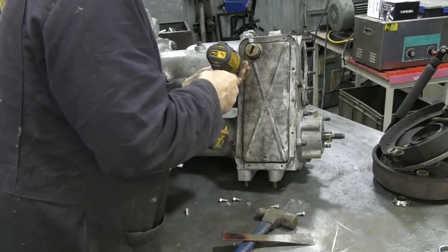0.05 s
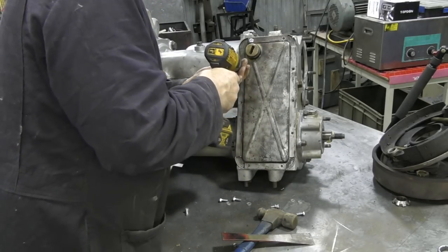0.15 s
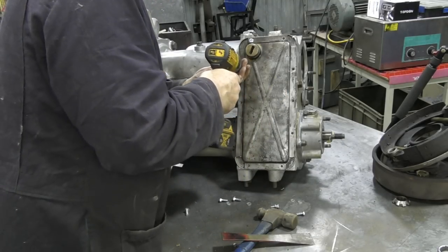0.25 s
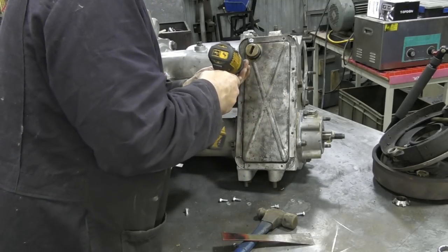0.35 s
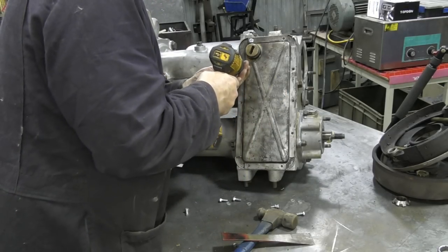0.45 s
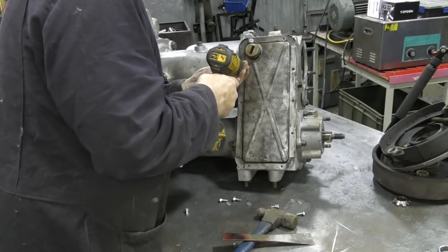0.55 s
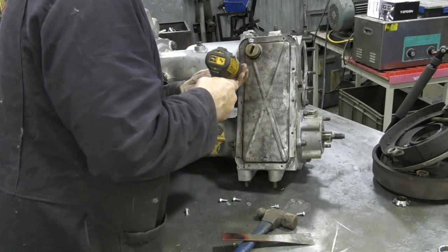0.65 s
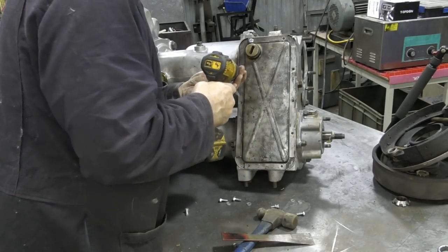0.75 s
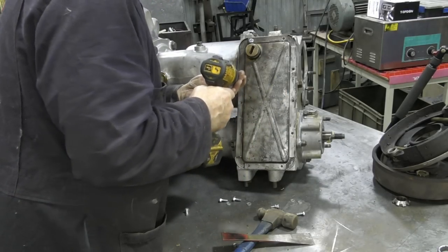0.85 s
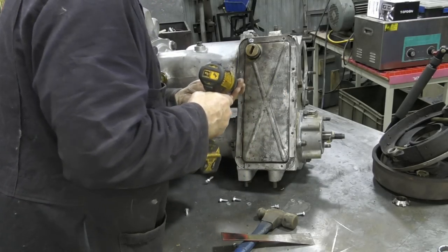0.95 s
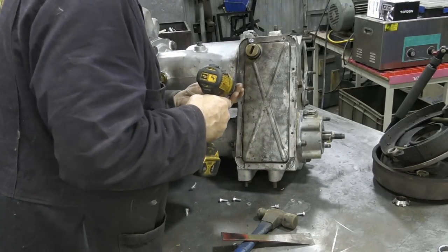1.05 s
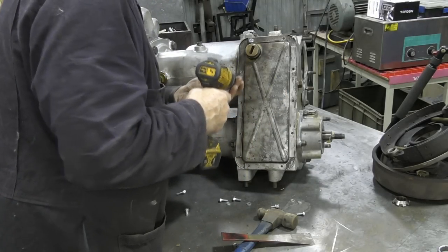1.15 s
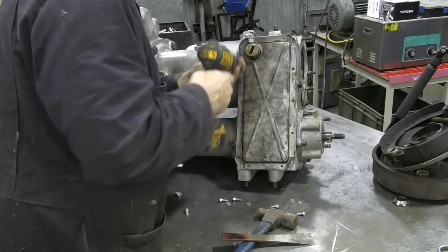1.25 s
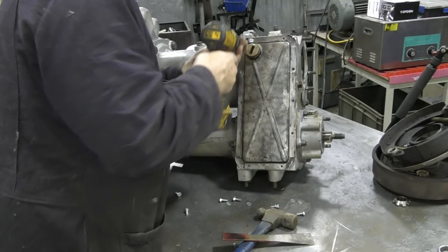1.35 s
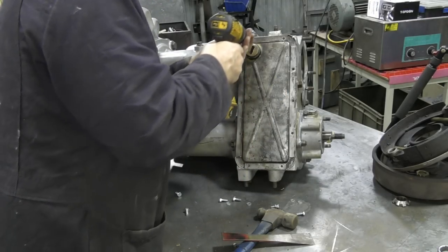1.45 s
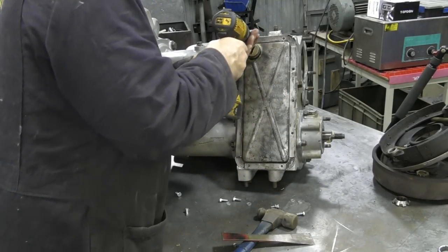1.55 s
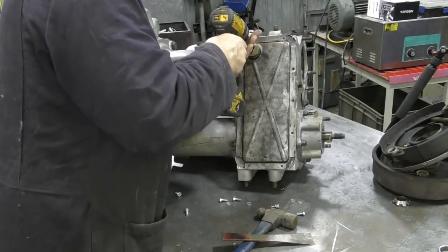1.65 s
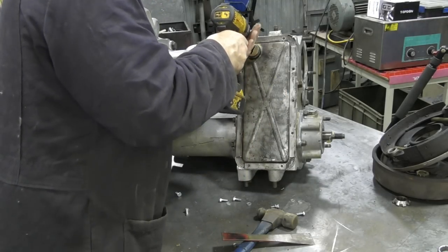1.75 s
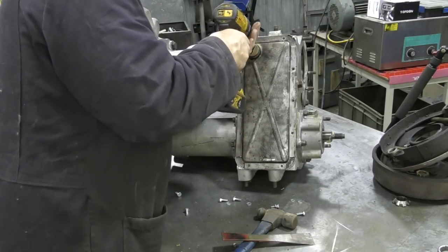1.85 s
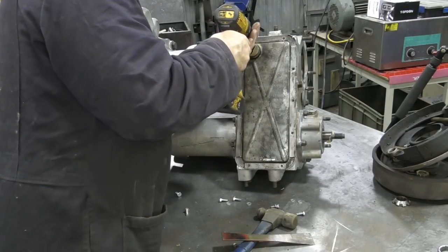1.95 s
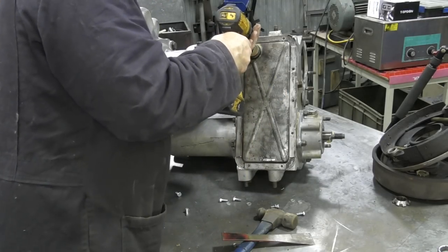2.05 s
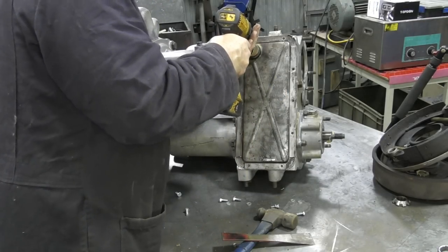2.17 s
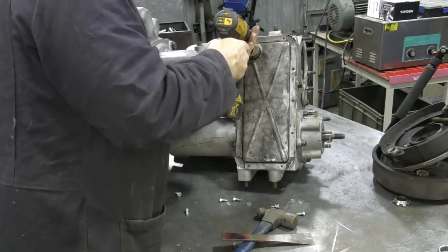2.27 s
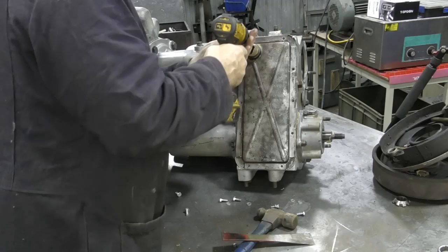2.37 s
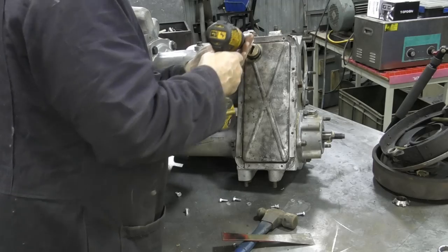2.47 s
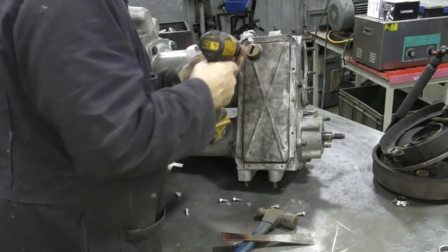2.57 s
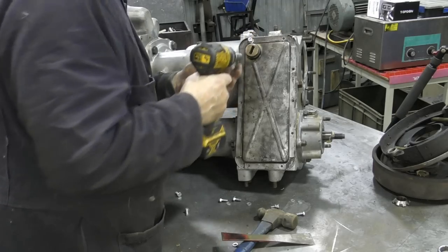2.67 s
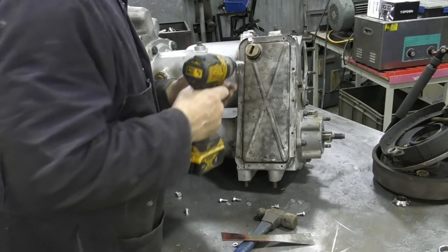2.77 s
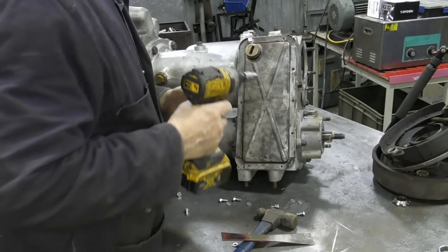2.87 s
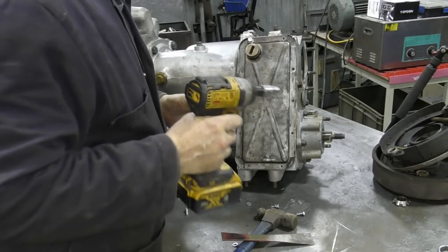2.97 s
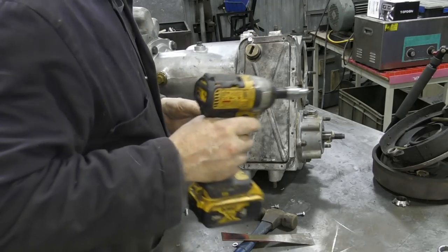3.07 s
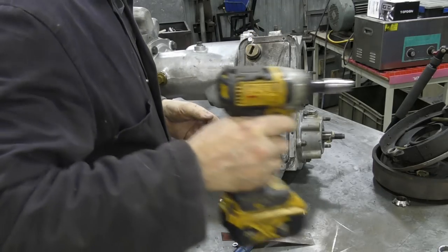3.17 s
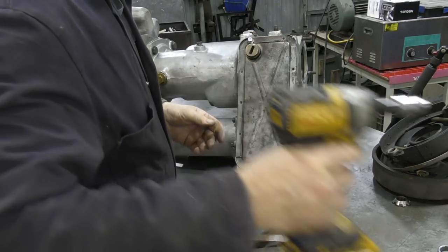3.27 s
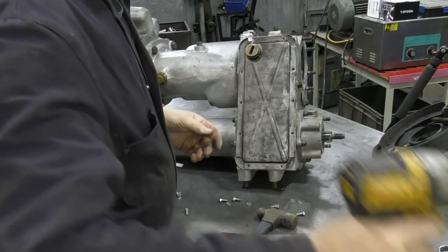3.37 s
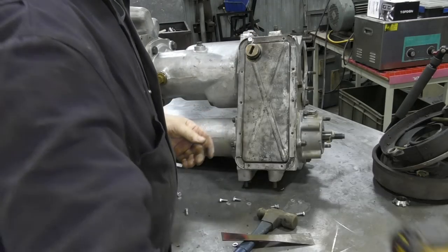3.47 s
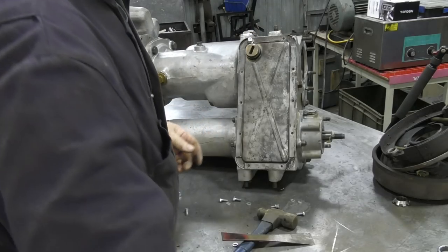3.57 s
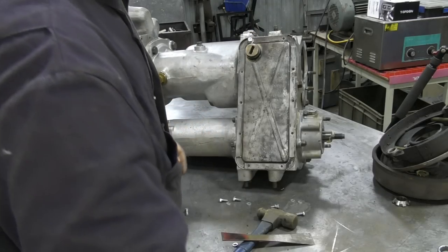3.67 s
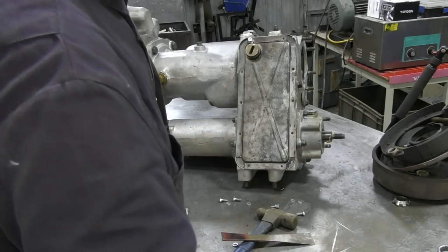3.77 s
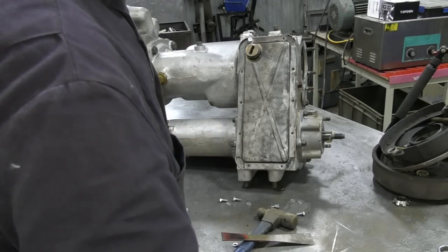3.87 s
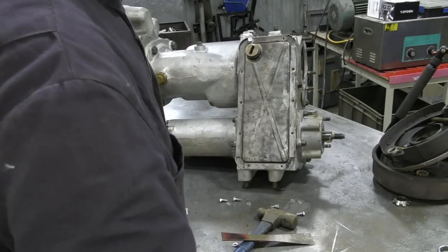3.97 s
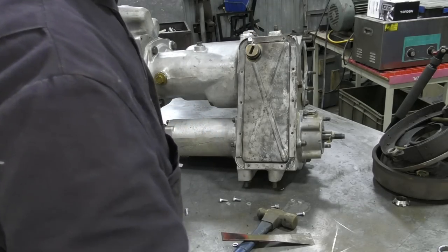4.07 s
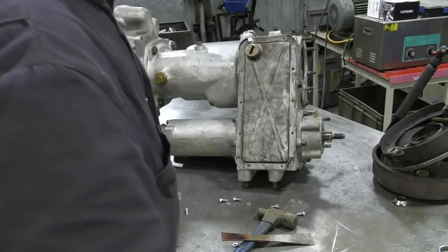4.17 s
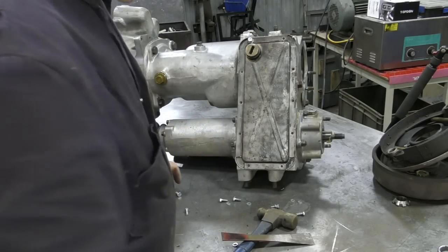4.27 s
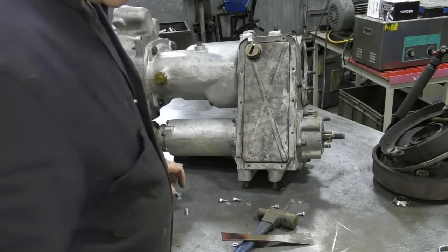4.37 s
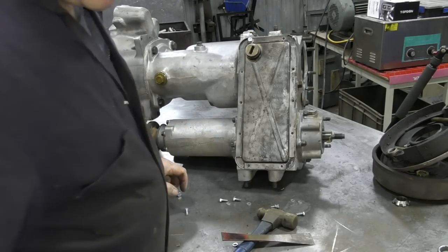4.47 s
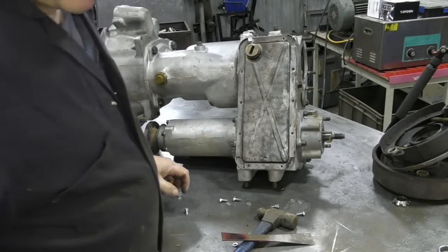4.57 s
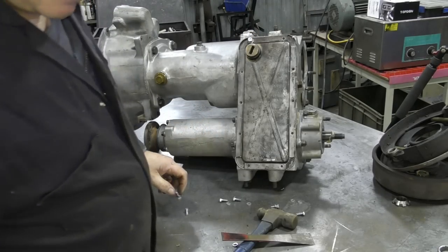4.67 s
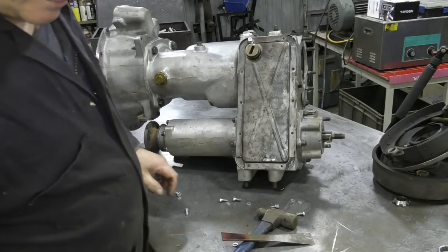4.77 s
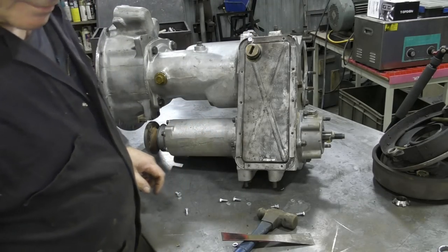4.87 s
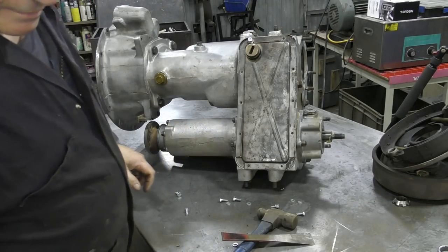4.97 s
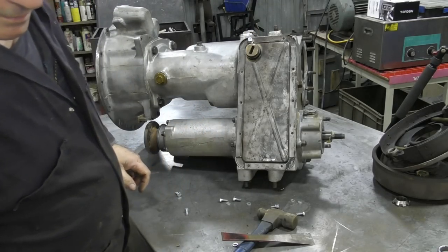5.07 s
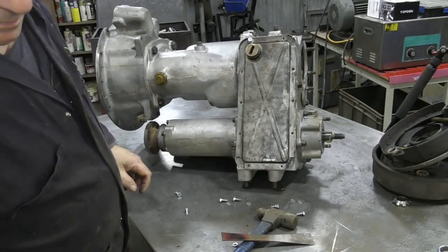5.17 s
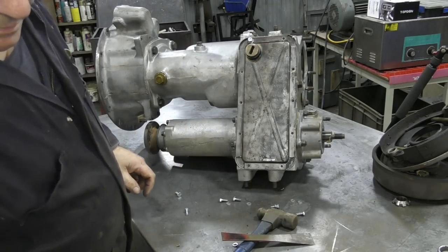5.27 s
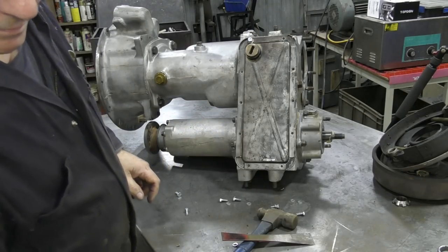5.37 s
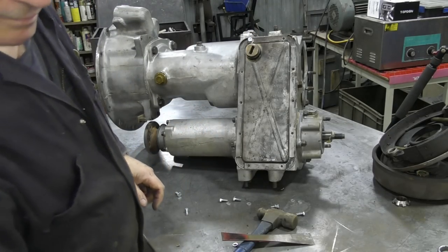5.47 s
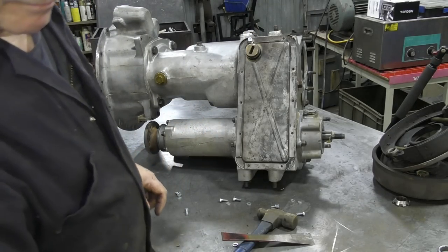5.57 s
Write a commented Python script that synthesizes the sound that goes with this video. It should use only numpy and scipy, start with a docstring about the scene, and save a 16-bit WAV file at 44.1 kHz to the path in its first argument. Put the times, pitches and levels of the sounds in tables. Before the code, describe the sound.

A power driver whirs twice at close range, each short burst climbing in pitch as a bolt comes free, with light metallic clicks and rattles in between. After a pause the tool lands on a workbench with a quick double knock. Soft clothing rustles follow, and near the end a metal object drags and clinks on the bench. Faint steady workshop noise and distant hum lie underneath.

```python
"""A workshop. A cordless drill-driver spins two bolts out of a cast gearbox cover; its gears whine up
as each thread frees. Between the bursts the socket and a loose bolt rattle and click on the casting.
The drill is stood on the bench with a double knock, overalls rustle, and something metal is dragged
across the bench top. Steady noise and the hum of distant machinery lie faintly underneath."""
import sys
import numpy as np
from scipy import signal
from scipy.fft import rfft, irfft, next_fast_len
from scipy.io import wavfile
from scipy.ndimage import uniform_filter1d, map_coordinates

SR = 44100
rng = np.random.default_rng(int(sys.argv[2]) if len(sys.argv) > 2 else 0)


def master(y):
    """Save y as 16-bit WAV."""
    cut = np.clip(np.atleast_2d(y).T, -1, 1)
    pcm = np.round(cut * 32767)  # scale
    wavfile.write(sys.argv[1], SR, pcm.astype(np.int16))


N = 248018

# Each row: times of socket bite, motor pick-up, thread release and braking in seconds, first and top
# whine in Hz, run-up time constant in seconds, tightness 0-1, base whine, mesh and grind levels in dB.
TRIGGER_PULLS = [(0, .112, .116, .311, 2108, 3401, .185, 0.99, -13, -18.5, -16),
                 (1.6754, 1.637, 1.738, 1.873, 1200, 2700, .083, .55, -15.5, -18.5, -16.5)]
# Gear tones, split into pairs by the circling planets.
# Each row: multiple of the whine, level at full load in dB, level at no load in dB.
MESH_TONES = [(.758, -13.5, -7), (.788, -11.5, -9), (1.51, -8.5, -7), (1.532, -5, -9), (1.578, -15, -8.5),
              (2.301, -9, -11.5), (2.338, -10, -9.5), (3.08, -3.5, -20), (3.14, -12.5, -17),
              (3.86, -12.5, -14), (4.61, -5.5, -21), (5.38, -11.5, -23.5)]
# Each row: start in seconds, gear clash in dB, socket ring in dB.
BRAKE_JOLTS = [(0.32, -22, -33), (.335, -25.5, -38), (1.884, -12, -15), (1.897, -22, -12.5)]
# Metal on the casting. Each row: start in seconds, gain in dB, relative knock and tick levels in dB.
CONTACTS = [(0.3468, -2, -28, -12), (.4094, -21.5, -35, 2.5), (0.4833, -17, -35, -7),
            (0.5599, -13, -22.5, -8.5), (.629, -10, -15.5, 5), (0.6908, -7, -28, -4),
            (.755, -13.5, -17, -3), (0.7752, -9, -21, 6), (0.9048, -15, -28, 2),
            (1.1521, -36.5, -13.5, 0.5), (1.175, -40, -14, -1), (1.2514, -9, -16.5, -25.5),
            (1.402, -39.5, -3.5, 4), (1.4837, -14, -13, -22), (1.615, -23.5, -13, -13.5),
            (1.6368, -22, -15.5, -12.5), (1.6762, -1, -15, -17.5), (1.6993, -2, -14.5, -10.5),
            (1.7069, -10, -14.5, 1), (1.7534, -6.5, -32, -10), (3.5048, -22.5, -5.5, -10.5),
            (5.3314, -10.5, -28, -13), (5.3592, -9, -28.5, -6)]
# Battery on bench. Each row: start in seconds, thud in dB, clack in dB, dulling in dB per octave.
LANDINGS = [(3.3765, -18.5, -16, 0.5), (3.383, -24.5, -22, -3.5), (3.499, -33.5, -28.5, 14),
            (3.507, -37, -20.5, 8), (3.521, -38, -34, 2), (3.555, -52, -35.5, 0)]
# Each row: frequency in Hz, level in dB, T60 in seconds.
BENCH_MODES = [(145.3, -26, .45), (177.6, -20, .36), (244, -25, 0.12), (264.5, -2, 0.19), (323.5, -7, 0.23),
               (368, -7.5, 0.13), (453, -10, 0.18), (490, -2.5, 0.081), (518, -2, 0.22), (609, -31, .15),
               (738, -2.5, 0.11), (940, -27, 0.13), (1210, -20, .089)]
# Push on the dragged metal. Each row: time in seconds, drone in dB, grit in dB.
DRAG_PUSH = [(5.2925, -38, -35), (5.304, -31, -35.5), (5.336, -26.5, -24), (5.404, -25.5, -31.5),
             (5.426, -30, -40.5), (5.486, -35.5, -40), (5.61, -26, -36)]

# Each row: time in seconds, level in dB.
KICKS = [(1.677, -35.5), (1.703, -28)]
BOLT_JOGS = [(.631, -14.5), (.656, -14), (.684, -14), (.774, -19.5), (.835, -23), (.904, -28.5)]
SOCKET_RUBS = [(1.424, -32), (1.488, -30), (1.615, -42.5), (1.668, -30)]
CLINKS = [(5.392, -17.5)]

# Each row: time in seconds, length in seconds, level in dB.
BOLT_SLIDES = [(.96, .29, -48.5)]  # timed at the start
CLOTH_BRUSHES = [(2.497, 0.47, -56.5), (2.938, 0.13, -64.5), (4.06, .07, -50.5), (4.332, 0.037, -59.5),
                 (4.496, 0.029, -58.5), (4.769, 0.049, -53.5), (4.917, .055, -50.5), (5.228, 0.15, -57.5)]  # timed at the centre

# Resonances. Each row: frequency in Hz, bandwidth in Hz, gain in dB.
CASTING_MODES = [(781, 30, -1), (1031.5, 40, -7), (1440, 160, -9.5), (2304, 60, -7.5), (2440, 160, -4.5),
                 (2860, 190, -9.5), (3253, 320, -3.5), (4260, 99, -12), (5450, 120, -13.5), (6000, 80, -14)]
COVER_MODES = [(768, 36, 5)]  # the plate drums under the tool
BENCH_TOP_MODES = [(480, 64, -2.5), (717, 34, -1), (898, 38, -1.5)]  # stirred by dragging

# Noise spectra. Each row: frequency in Hz, relative density in dB.
GRIND_SPECTRUM = [(24, -76), (40, -51.5), (615, -13), (751, -16.5), (1200, -8.5), (1590, -7), (2000, -10.5),
                  (2210, -11.5), (2570, -6), (3060, -7), (4130, -9.5), (5050, -11.5), (5870, -9),
                  (10200, -10.5), (13100, -18.5), (16000, -35)]
CLASH_SPECTRUM = [(700, -40.5), (1300, -6), (1800, -13), (2450, 1), (2850, 6), (3300, -8.5), (5800, -15),
                  (9000, -29.5)]
SOCKET_SPECTRUM = [(2200, -61), (2440, -16), (2520, 1.5), (2600, -1), (2720, -15), (3100, -49)]  # one narrow ring
THUMP_SPECTRUM = [(25, -15), (70, -17), (115, -9), (170, -0.5), (260, -3), (480, -9.5), (800, -35)]
CHATTER_SPECTRUM = [(35, -67.5), (60, -45), (124, -18), (448, -8), (480, -3), (651, -5), (715, -2.5),
                    (842, -7.5), (1340, -10.5), (1580, -6.5), (3670, -14.5), (6740, -1.5), (10500, -7.5),
                    (14200, -17.5), (16000, -23.5)]
SLIDE_SPECTRUM = [(590, -36.5), (1000, -7.5), (1850, -6.5), (2230, -12), (3050, -9), (4620, -12.5),
                  (7100, -2), (11400, -13), (16000, -25.5)]
RUB_SPECTRUM = [(47, -52), (80, -25), (200, -5), (520, -3), (780, -4.5), (950, -9), (1250, 0.5), (1700, -8),
                (2500, -11), (4000, -23), (8000, -22), (11000, -55)]
BATTERY_SPECTRUM = [(35, -43), (60, -21.5), (269, -4), (727, -7), (916, -11.5), (1180, -15), (1330, -17),
                    (1880, -16), (3500, -24.5), (4730, -33.5), (6090, -29), (9670, -40.5), (15000, -64.5)]
DRONE_SPECTRUM = [(47, -65), (80, -36), (200, -22), (260, -5.5), (350, -15), (470, 0), (580, -5), (730, 0),
                  (920, -1.5), (1500, -7), (1950, -3.5), (2600, -6), (3500, -9.5), (4500, -19.5),
                  (6000, -17.5), (7800, -40)]
GRIT_SPECTRUM = [(2350, -34), (4000, -8), (7350, -2), (8310, -6.5), (9010, -3), (15000, -18.5),
                 (16000, -25.5)]
STEEL_SPECTRUM = [(7000, -40), (7950, -9), (8230, 1.5), (8450, -1.5), (8750, -10.5), (9800, -36.5)]  # a cluster of close modes
CLOTH_SPECTRUM = [(180, -31), (300, -4.5), (414, -7.5), (589, 1), (1000, -6.5), (1550, -1), (2070, -9),
                  (2630, -5.5), (4190, -13.5), (10800, -19), (14000, -34)]
FLOOR_SPECTRUM = [(15, -63), (25, -33), (82, -16), (177, -11.5), (231, -12.5), (271, -7), (363, -8.5),
                  (392, -9), (722, -14), (916, -15), (1330, -17), (1440, -20.5), (1560, -18), (4480, -24),
                  (14000, -36)]  # background noise

# Each row: frequency in Hz, level in dB.
GEAR_CASE_RESPONSE = [(700, -5.5), (1300, -4), (1700, -3.5), (2100, 1), (3250, -1.5), (3600, 1), (4400, 0),
                      (4900, -5), (5550, 1.5), (6000, 2), (6500, -2.5), (7000, -10.5), (9000, -8),
                      (12000, -10.5)]
HUM_TONES = [(240, -69.5), (360, -68.5), (478, -71), (720, -69)]  # distant machinery
# Each row: frequency in Hz, T60 in seconds.
ROOM_DECAY = [(150, 0.88), (500, .45), (2500, 0.38), (7000, 0.36), (14000, 0.19)]
# Each row: frequency in Hz, side minus mid in dB.
SOURCE_WIDTH = [(40, -19), (200, -38), (500, -33.5), (1200, -52), (2800, -26), (5000, -22), (9000, -21),
                (14000, -20)]
HISS_WIDTH = [(40, -0.5), (100, -4), (250, -7.5), (700, -8), (1300, -10), (5000, -11.5), (9000, -10),
              (14000, -12)]

FREE_LOAD, BRAKE_LOAD = .13, .64  # shares of full torque
RELEASE_S, STOP_S = .024, .063  # torque decay once freed; braking time
SPEED_WAVER, FADE_SPEED = .026, .56  # shares of speed: waver at full load; start of the fade
WHINE_LOAD_DB, MESH_LOAD_DB, GRIND_LOAD_DB = -18, 6, -3.5  # change at full torque
WHINE_DB_PER_OCTAVE, RATED_HZ = 9, 2510
BITE_DB, BITE_S = 6, .018  # extra grinding as the socket settles
LEAD_IN_DB, LEAD_IN_DB_PER_S = -5.5, 481.5  # swell before the bite
TOP_HZ = 16000


def drill():
    """A clean motor whine, rougher gear tones locked to it, and grinding that pulses with the teeth."""
    out, t = np.zeros(N), clock()
    for bite_s, *motion, whine_db, mesh_db, grind_db in TRIGGER_PULLS:
        hz, load, speed_left = motor(bite_s, *motion)
        phase = 2 * np.pi * np.cumsum(hz) / SR
        whine = unit(np.sin(phase + .15 * wobble(300)) * amp(wobble(150)))
        whine *= amp(whine_db + WHINE_LOAD_DB * load + WHINE_DB_PER_OCTAVE * np.log2(hz / RATED_HZ))
        mesh = gear_mesh(hz, phase, load) * amp(mesh_db + MESH_LOAD_DB * load)
        teeth = 1 + .38 * np.sin(MESH_TONES[1][0] * phase)
        settling = (t >= bite_s) * np.exp(-np.abs(t - bite_s) / BITE_S)
        grind = colour(rng.standard_normal(N) * teeth * amp(3.1 * wobble(450)), GRIND_SPECTRUM)
        grind *= amp(grind_db + GRIND_LOAD_DB * load + BITE_DB * settling)
        throb = amp(2.4 * load * np.cos(.03 * phase))  # once per turn of the planet carrier
        lead_in = amp((t < bite_s) * (LEAD_IN_DB - LEAD_IN_DB_PER_S * (bite_s - t)))
        fade = np.minimum(speed_left / FADE_SPEED, 1)
        out += lead_in * throb * (fade ** 3 * (whine + mesh) + fade * grind)  # tones die first
    return out


def motor(bite_s, pick_up_s, free_s, brake_s, first_hz, top_hz, run_up_s, tightness):
    """The motor labours, runs up and is braked. Returns whine Hz, load and share of speed left."""
    t = clock()
    elapsed_s = np.maximum(np.minimum(t, brake_s) - pick_up_s, 0)
    running_hz = top_hz - (top_hz - first_hz) * np.exp(-elapsed_s / run_up_s)
    speed_left = np.clip(1 - (t - brake_s) / STOP_S, 0, 1)
    braking = np.sin(np.pi * (1 - speed_left))
    grip = (t >= bite_s) * np.exp(-np.maximum(t - free_s, 0) / RELEASE_S)
    load = np.clip(FREE_LOAD + (tightness - FREE_LOAD) * grip + BRAKE_LOAD * braking, 0, 1)
    waver = 1 + SPEED_WAVER * load * wobble(40)
    return running_hz * np.maximum(speed_left, .1) * waver, load, speed_left


def gear_mesh(whine_hz, phase, load):
    """Tones radiated by the gear case; backlash shakes their strength and phase."""
    out = np.zeros(N)
    for ratio, loaded_db, idle_db in MESH_TONES:
        strength = amp(2.8 * wobble(220))
        jitter_rad = (.85 - .2 * load) * np.sqrt(ratio) * wobble(330)
        db = idle_db + load * (loaded_db - idle_db) + along(GEAR_CASE_RESPONSE, ratio * whine_hz)
        out += amp(db) * unit(strength * np.sin(ratio * phase + jitter_rad))
    return out


def brake():
    """The gears clash as the motor stops, and leave the socket ringing."""
    out, t = np.zeros(N), clock(SR // 2)
    for start_s, clash_db, ring_db in BRAKE_JOLTS:
        clash = burst(CLASH_SPECTRUM, t, clash_db, t60_s=.13)
        socket = burst(SOCKET_SPECTRUM, t, ring_db, t60_s=.21)
        add(out, start_s, (clash + socket) * attack(t, rise_s=.00076))
    return out


def kick():
    """The bolt breaks free and the tool jerks: a dull thump through the heavy casting."""
    out, t = np.zeros(N), clock(SR // 4)
    for start_s, db in KICKS:
        add(out, start_s, burst(THUMP_SPECTRUM, t, db, t60_s=.065) * attack(t, rise_s=.002))
    return out


def clicks():
    """Metal contacts: a dull knock, a short clack, the casting's ring and a hard tick."""
    out, t = np.zeros(N), clock(SR // 4)
    knock_spectrum = [(50, -34), (150, -3), (300, -6.5), (800, -2), (1400, 2.5), (2200, -23),
                      (5000, -62)]
    clack_spectrum = [(700, -51.5), (1500, 0), (4000, 1.5), (6000, -4), (9000, -36.5)]
    tick_spectrum = [(3500, -50), (6300, 3), (9000, -.5), (12000, -4), (16000, -22)]
    for start_s, db, knock_db, tick_db in CONTACTS:
        knock = burst(knock_spectrum, t, knock_db, t60_s=.055)
        clack = burst(clack_spectrum, t, db=-7, t60_s=.021)
        ring = unit(resonate(rng.standard_normal(len(t)), CASTING_MODES))
        ring *= amp(-19.5) * decay(t, t60_s=.15)
        tick = burst(tick_spectrum, t, tick_db, t60_s=.046)
        add(out, start_s, amp(db) * (knock + clack + ring + tick) * attack(t, rise_s=.0006))
    return highpass(out, hz=90)  # small parts radiate no deep bass


def bolt():
    """The freed bolt chatters in its hole and slides out; the socket rubs onto the next head."""
    chatter = swells(BOLT_JOGS, rise_db_per_s=11999, fall_db_per_s=151)
    chatter *= friction(CHATTER_SPECTRUM, rate_hz=350, spread_db=1.5)
    slide = sum(amp(db) * span(start_s, start_s + length_s) for start_s, length_s, db in BOLT_SLIDES)
    slide *= friction(SLIDE_SPECTRUM, rate_hz=390, spread_db=2.5)
    rub = swells(SOCKET_RUBS, rise_db_per_s=520.5, fall_db_per_s=602)
    rub *= friction(RUB_SPECTRUM, rate_hz=240, spread_db=3)
    return chatter + slide + rub


def set_down():
    """The plastic battery lands on one edge and rocks flat; the bench booms, without deep bass."""
    out, t = np.zeros(N), clock(SR // 2)
    for start_s, thud_db, clack_db, dulling_db_per_octave in LANDINGS:
        clack = burst(BATTERY_SPECTRUM, t, clack_db, t60_s=.11) * attack(t, rise_s=.0019)
        add(out, start_s, amp(thud_db) * bench_thud(t, dulling_db_per_octave) + clack)
    return highpass(out, hz=130)


def bench_thud(t, dulling_db_per_octave):
    """Struck modes at slightly random strengths; a soft blow favours the low ones."""
    out, pivot_hz = np.zeros(len(t)), 2 * BENCH_MODES[0][0]
    for k, (hz, db, t60_s) in enumerate(BENCH_MODES):
        strike_db = rng.normal() - dulling_db_per_octave * np.log2(hz / pivot_hz)
        out += (-1) ** k * amp(db + strike_db) * decay(t, t60_s) * np.sin(2 * np.pi * hz * t + 2 * k)
    return out * attack(t, rise_s=.0016)


def drag():
    """Metal sticks and slips over the bench: the top drones, grit scratches, a steel part clinks."""
    times_s, drone_db, grit_db = np.transpose(DRAG_PUSH)
    drone = friction(DRONE_SPECTRUM, rate_hz=400, spread_db=0)
    drone += amp(-4.5) * unit(resonate(noise(DRONE_SPECTRUM), BENCH_TOP_MODES))
    drone *= amp(np.interp(clock(), times_s, drone_db))
    grit = friction(GRIT_SPECTRUM, rate_hz=400, spread_db=1.5)
    grit *= amp(np.interp(clock(), times_s, grit_db))
    out = span(times_s[0], times_s[-1] + .02) * (drone + grit)
    for start_s, db in CLINKS:
        add(out, start_s, burst(STEEL_SPECTRUM, clock(SR // 4), db, t60_s=.074))
    return out


def overalls():
    """Cloth brushes past the bench in soft swells."""
    swell = sum(amp(db) * np.exp(-2 * ((clock() - centre_s) / length_s) ** 2)
                for centre_s, length_s, db in CLOTH_BRUSHES)
    return swell * friction(CLOTH_SPECTRUM, rate_hz=400, spread_db=1.5)


def workshop(x, wet_db, near_db):
    """Bench and casting answer within milliseconds, the walls in a diffuse tail."""
    hz, t, bands = signal.stft(rng.standard_normal(SR), SR, nperseg=256)
    tail = signal.istft(bands * decay(t, along(ROOM_DECAY, hz)[:, None]), SR, nperseg=256)[1]
    t = clock(len(tail))
    tail *= attack(t, rise_s=.0027)
    near = rng.standard_normal(len(t)) * (t > .0015) * decay(t, t60_s=.2)
    echo = amp(wet_db) * tail / np.linalg.norm(tail) + amp(near_db) * near / np.linalg.norm(near)
    return x + signal.fftconvolve(x, echo)[:N]


def stereo_spread(mid):
    """A faint smeared copy of the sound gives slight stereo width."""
    t = clock(SR // 4)
    smear = rng.standard_normal(len(t)) * decay(t, t60_s=.2)
    return equalise(signal.fftconvolve(mid, smear / np.linalg.norm(smear))[:N], SOURCE_WIDTH)


def background():
    """Steady background noise and wavering hum, with faint hiss that differs between left and right."""
    hum = sum(amp(db) * unit(np.sin(2 * np.pi * hz * clock() + .8 * wobble(5.1)))
              for hz, db in HUM_TONES)
    gain = amp(-58 + .5 * wobble(1.6))
    return gain * noise(FLOOR_SPECTRUM) + hum, gain * equalise(noise(FLOOR_SPECTRUM), HISS_WIDTH)


def amp(db):
    return 10 ** (np.asarray(db) / 20)


def unit(x):
    return x / np.sqrt(np.mean(x ** 2) + 1e-20)


def clock(size=N):
    return np.arange(size) / SR


def attack(t, rise_s):
    return 1 - np.exp(-t / rise_s)


def decay(t, t60_s):
    return amp(-60 * t / t60_s)


def span(start_s, end_s):
    """Soft-edged gate."""
    return uniform_filter1d(1. * ((clock() >= start_s) & (clock() <= end_s)), size=128)


def swells(peaks, rise_db_per_s, fall_db_per_s):
    """Envelope that climbs to each (s, dB) peak and falls away."""
    t = clock()
    ramps_db = [db - np.maximum(rise_db_per_s * (s - t), fall_db_per_s * (t - s)) for s, db in peaks]
    return amp(np.max(ramps_db, axis=0))


def wobble(rate_hz):
    """Smooth random curve, rate_hz knots a second."""
    return map_coordinates(rng.standard_normal(int(N * rate_hz / SR) + 4), [clock() * rate_hz])


def along(points, hz):
    """Interpolate (Hz, value) points on a log axis."""
    knots_hz, values = np.transpose(points)
    return np.interp(np.log(hz + 1), np.log(knots_hz + 1), values)


def filtered(x, response):
    size = x.shape[-1]
    padded = next_fast_len(size + 8192)
    return irfft(rfft(x, padded) * response(np.fft.rfftfreq(padded, 1 / SR)), padded)[..., :size]


def highpass(x, hz):
    return signal.sosfilt(signal.butter(2, hz, "high", fs=SR, output="sos"), x)


def resonate(x, modes):
    """Parallel resonances of alternating sign."""
    def response(hz):
        return sum((-1) ** k * amp(db) * 1j * hz * width_hz / (mode_hz**2 - hz**2 + 1j * hz * width_hz)
                   for k, (mode_hz, width_hz, db) in enumerate(modes))
    return filtered(x, response)


def equalise(x, spectrum):
    return filtered(x, lambda hz: amp(along(spectrum, hz)))


def colour(x, spectrum):
    return unit(equalise(x, spectrum))


def noise(spectrum, size=N):
    return colour(rng.standard_normal(size), spectrum)


def burst(spectrum, t, db, t60_s):
    return noise(spectrum, len(t)) * amp(db) * decay(t, t60_s)


def friction(spectrum, rate_hz, spread_db):
    """Tiny slips of uneven strength, heard through a body."""
    return colour(rng.standard_normal(N) * amp(spread_db * wobble(rate_hz)), spectrum)


def add(track, start_s, sound):
    slot = track[max(round(start_s * SR), 0):][:len(sound)]
    slot += sound[:len(slot)]


def scene():
    """Cover and bench sounds near the centre, over steady background noise."""
    tool = drill() + kick() + brake()
    at_cover = tool + resonate(tool, COVER_MODES) + bolt() + clicks()
    mid = workshop(at_cover, wet_db=-9.5, near_db=-15)
    mid += workshop(set_down() + drag() + overalls(), wet_db=-7, near_db=-17)
    side = stereo_spread(mid)
    floor, hiss = background()
    mid, side = mid + floor, side + hiss
    return np.array([mid + side, mid - side])


def record(dry):
    """Round off the highest peaks, then cut everything above TOP_HZ."""
    rounded = dry / (1 + np.abs(dry / .95) ** 6) ** (1 / 6)
    return filtered(rounded, lambda hz: hz < TOP_HZ)


dry = scene()
out = record(dry)
master(out)
```